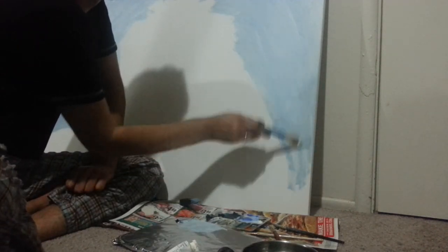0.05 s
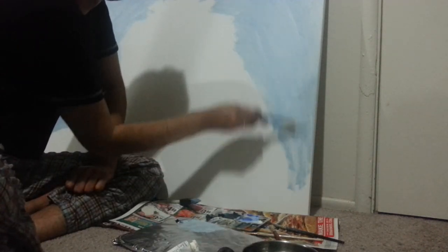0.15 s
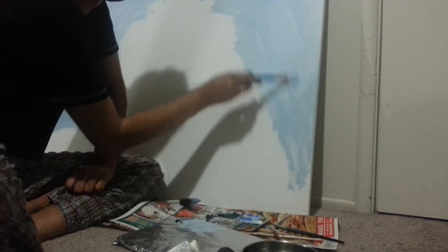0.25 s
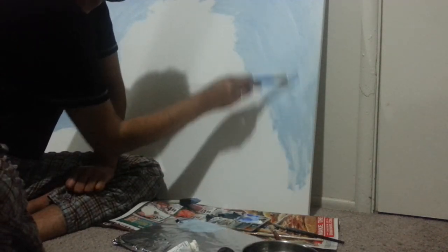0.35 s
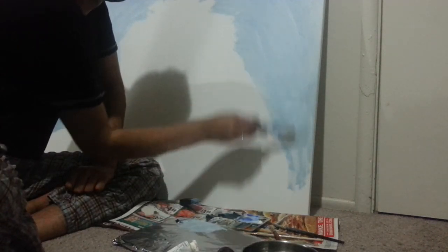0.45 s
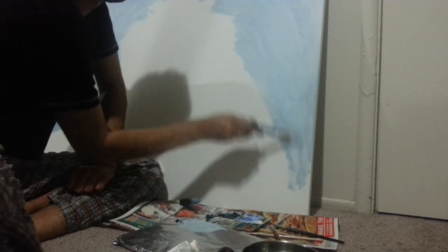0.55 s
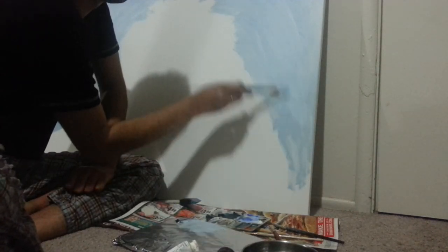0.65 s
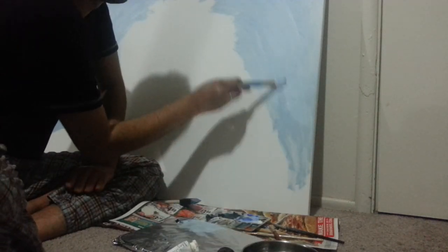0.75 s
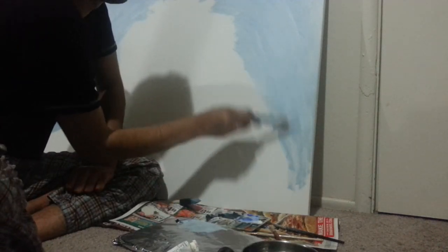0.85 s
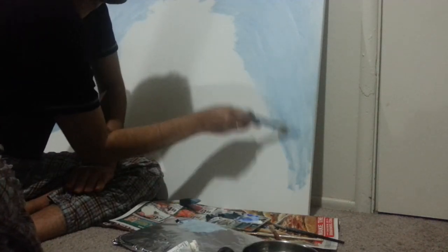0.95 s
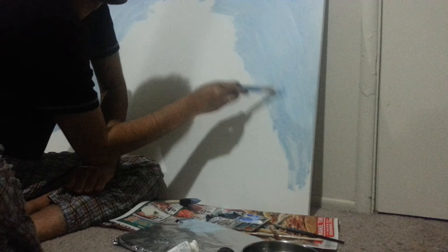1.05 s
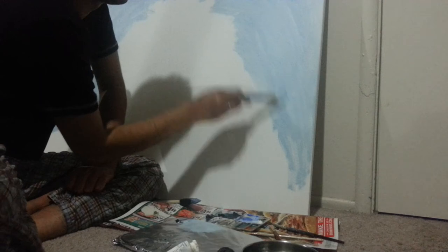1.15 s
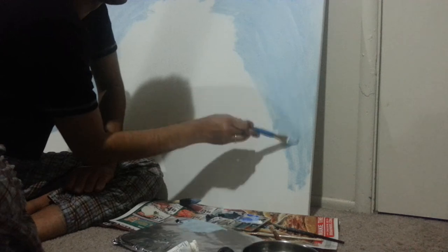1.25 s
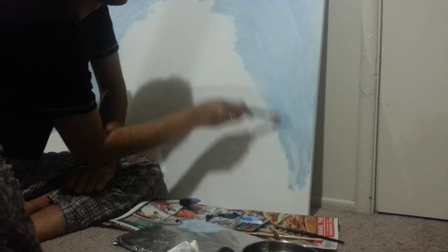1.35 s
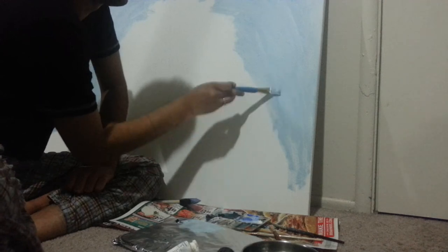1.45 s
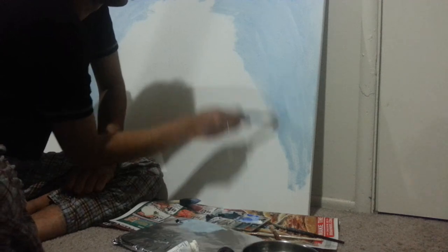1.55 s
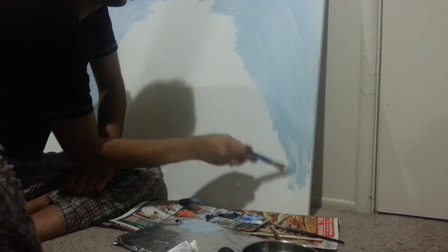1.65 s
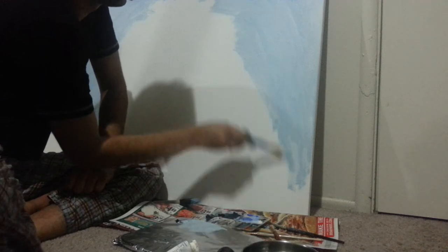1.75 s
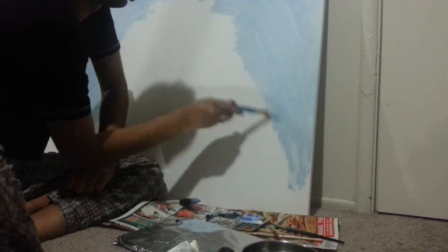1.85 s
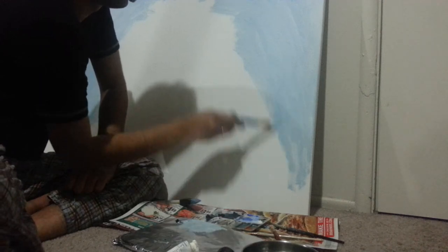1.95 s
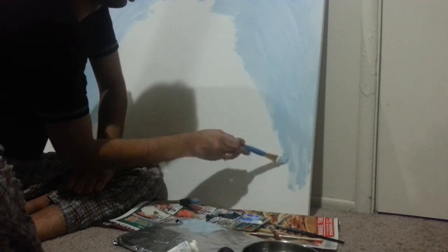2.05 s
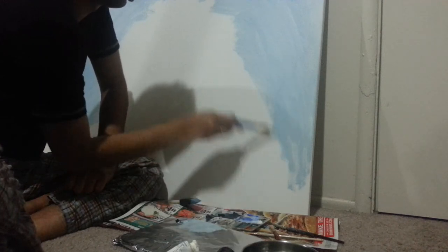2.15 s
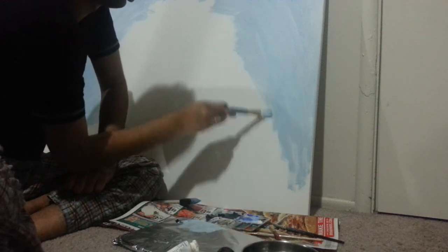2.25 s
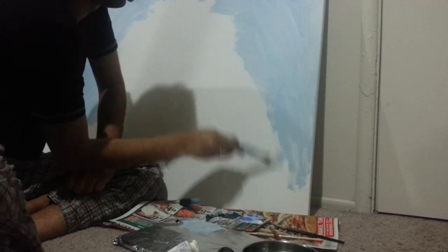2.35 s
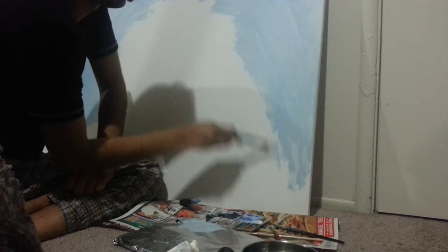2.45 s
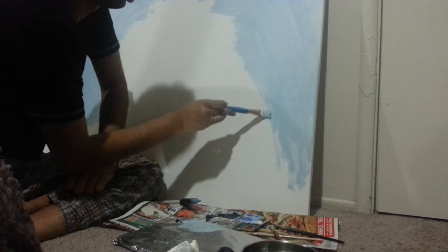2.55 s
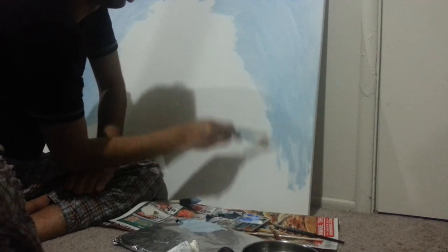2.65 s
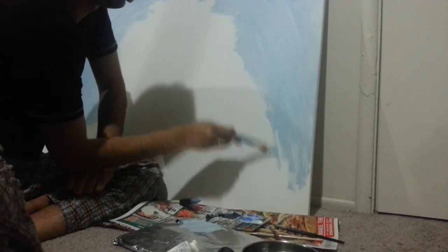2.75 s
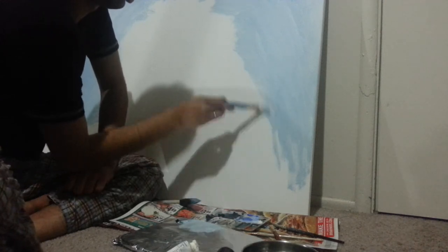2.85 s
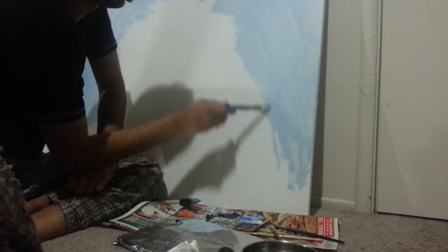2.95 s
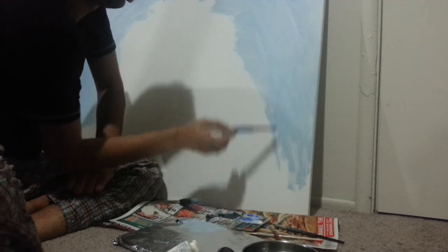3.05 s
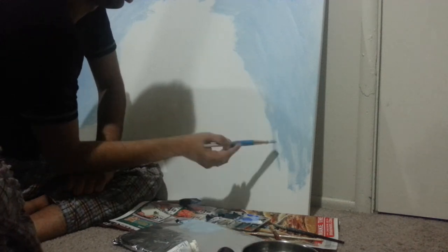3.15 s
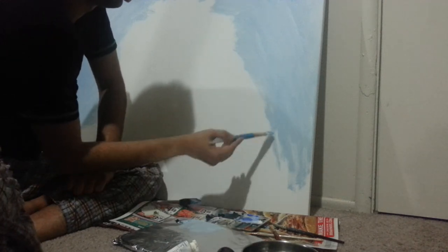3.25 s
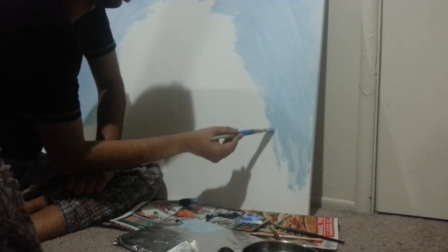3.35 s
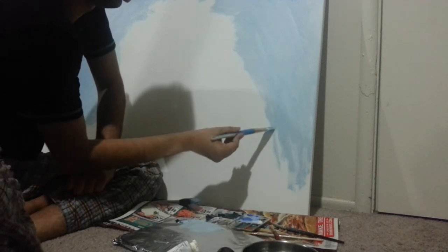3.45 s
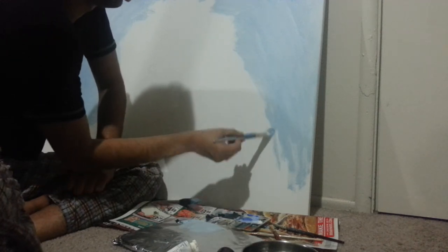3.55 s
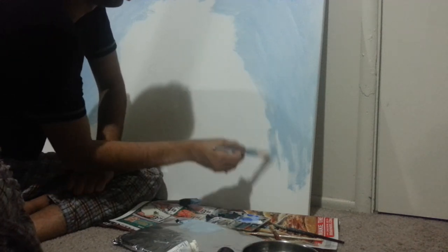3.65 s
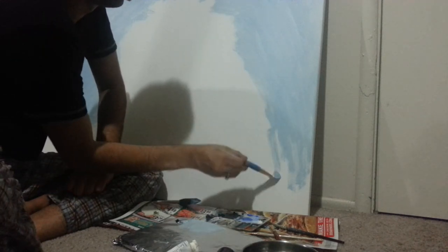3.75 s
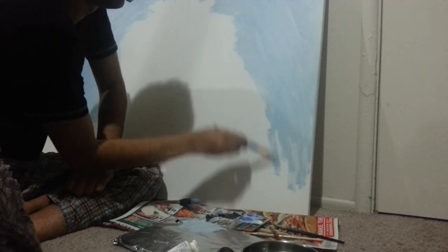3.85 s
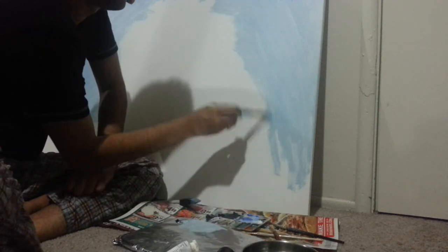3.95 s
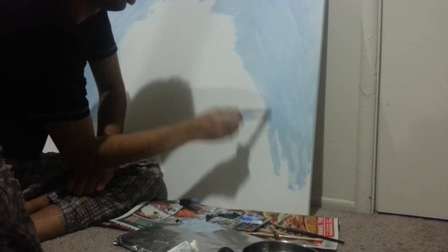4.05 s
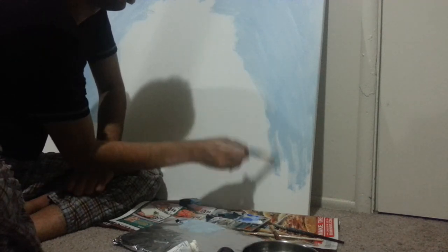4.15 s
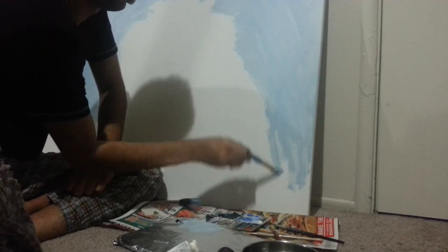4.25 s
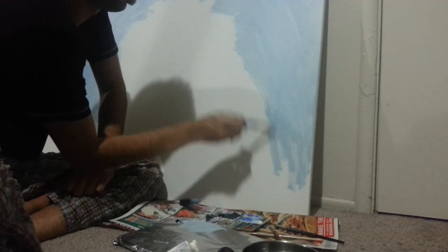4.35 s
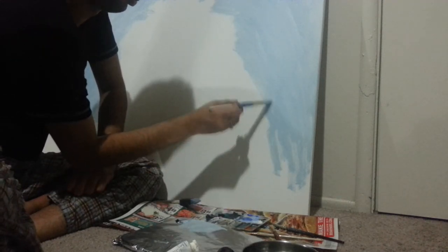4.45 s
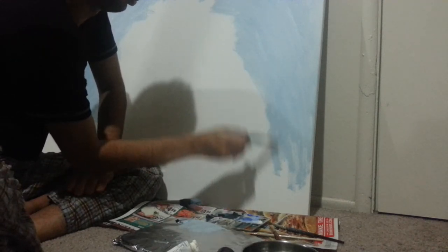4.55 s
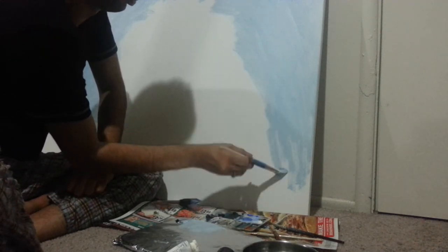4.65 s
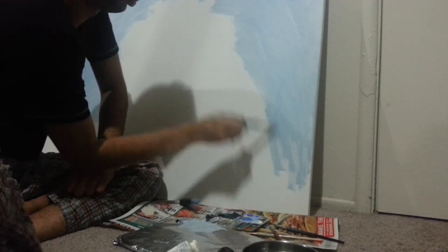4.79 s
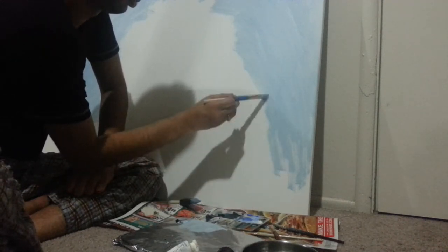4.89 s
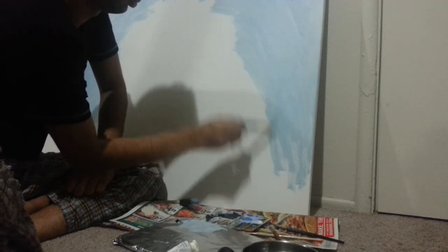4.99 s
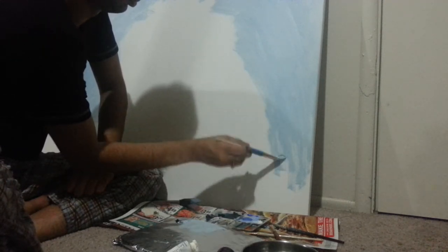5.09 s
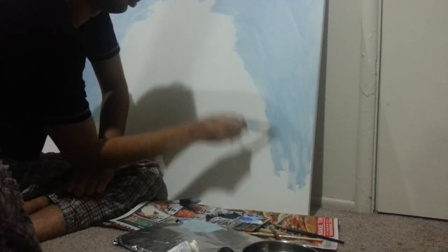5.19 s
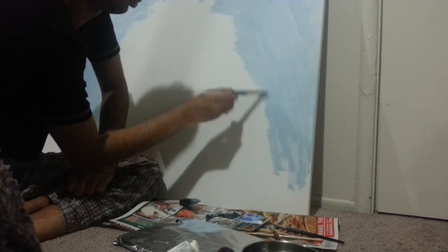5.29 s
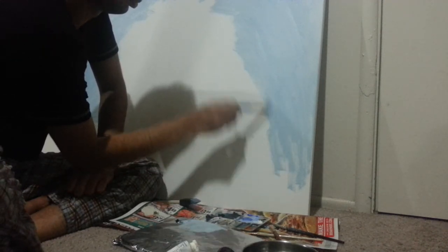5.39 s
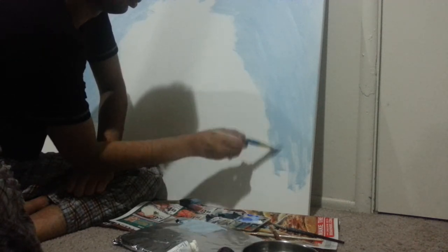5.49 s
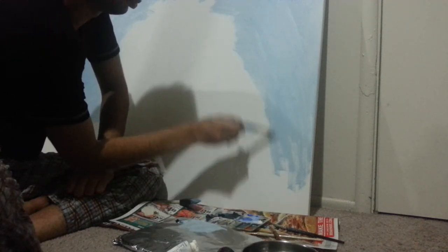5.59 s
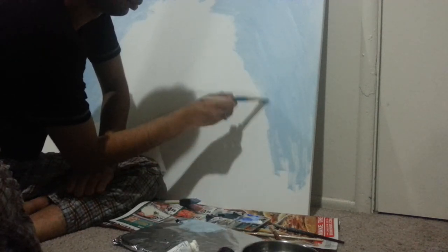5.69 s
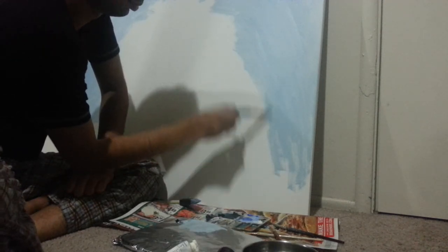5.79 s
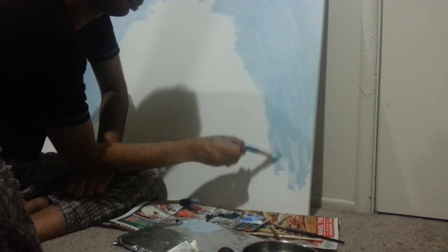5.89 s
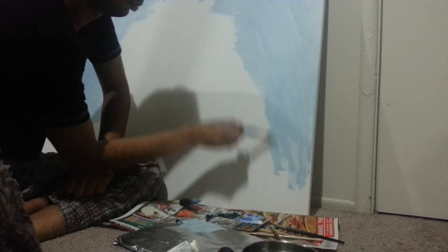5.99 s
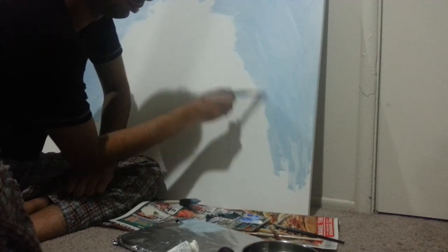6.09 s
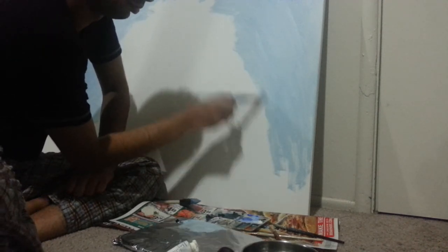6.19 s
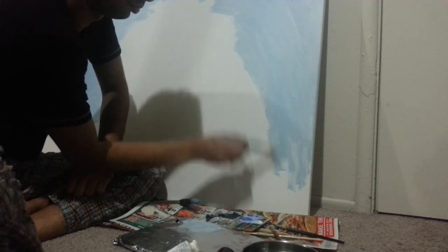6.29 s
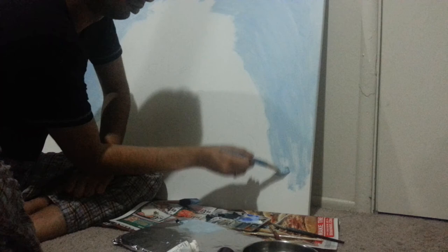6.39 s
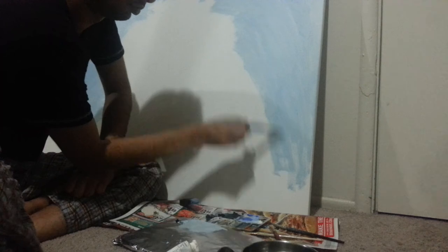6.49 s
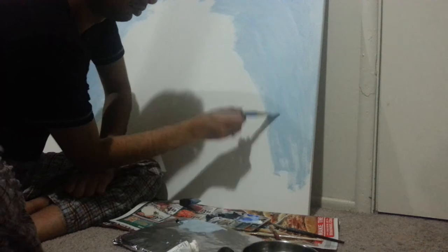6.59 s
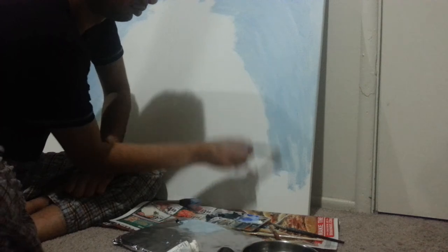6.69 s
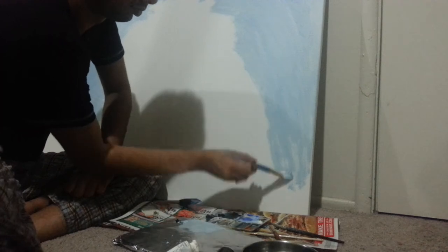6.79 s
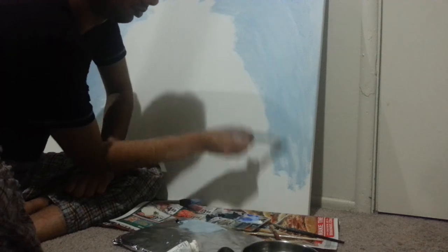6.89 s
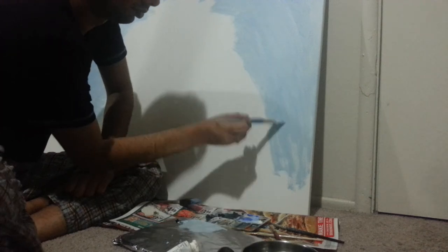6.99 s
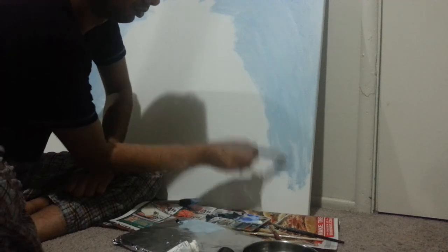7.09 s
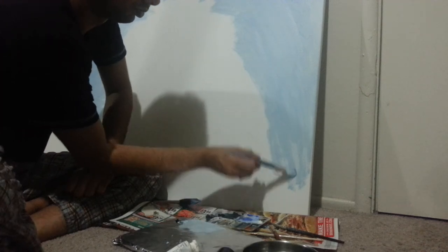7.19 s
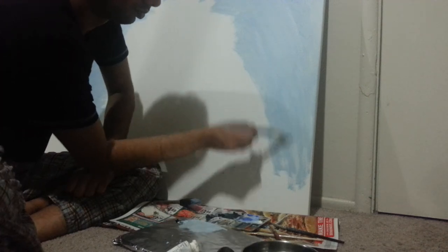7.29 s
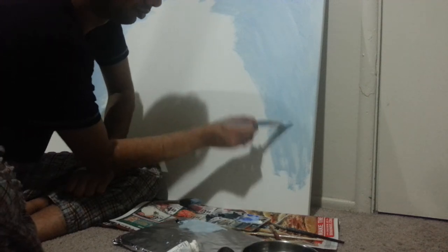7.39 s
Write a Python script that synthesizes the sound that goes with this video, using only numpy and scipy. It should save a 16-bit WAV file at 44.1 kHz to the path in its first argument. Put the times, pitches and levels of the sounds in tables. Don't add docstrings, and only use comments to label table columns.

```python
import sys
import numpy as np
from scipy import signal
from scipy.io import wavfile
from scipy.ndimage import uniform_filter1d

SR = 44100
rng = np.random.default_rng(int(sys.argv[2]) if len(sys.argv) > 2 else 0)


def nominal_scale(level):
    x = np.asarray(level, float) / 20
    return 10 ** x


def unload_wav(signal):
    wavfile.write(
        sys.argv[1],
        SR,
        np.round(np.clip(np.atleast_2d(signal).T, -1, 1) * 32767).astype(np.int16),
    )


N = 327663

# start t/s, rise t/s, hold t/s,
# fizz level/dB, drift over the hold level/dB
STROKES = [(-0.03, 0.029, 0.07, -30, -3), (0.117, 0.09, 0.089, -31.5, -8.5),
           (0.354, 0.051, 0.084, -35.5, 2.5), (0.562, 0.033, 0.089, -31.5, -3),
           (0.734, 0.15, 0.018, -35.5, -1.5), (0.957, 0.06, 0.056, -31.5, -3),
           (1.12, 0.1, 0.029, -36.5, -1), (1.325, 0.045, 0.071, -35.0, -6.5),
           (1.509, 0.043, 0.098, -43.5, 3.5), (1.755, 0.025, 0.095, -34.5, -3.5),
           (1.932, 0.048, 0.068, -44.5, 3.5), (2.114, 0.056, 0.053, -32.5, -2.5),
           (2.27, 0.087, 0.017, -30.5, 1), (2.412, 0.1, 0.005, -29.0, 0.5),
           (2.596, 0.089, 0.0083, -30, 0.5), (2.746, 0.094, 0.098, -31, -18),
           (3.566, 0.028, 0.095, -60, 23), (3.7, 0.035, 0.03, -47.5, -2),
                 (3.822, 0.057, 0.087, -39.5, 2), (4.094, 0.041, 0.042, -45.0, 3.5),
                 (4.285, 0.074, 0.028, -38.0, 0), (4.477, 0.12, 0.056, -42, -5),
                 (4.712, 0.079, 0.035, -40, -3.5), (4.916, 0.13, 0.014, -38.0, -0.5),
                 (5.124, 0.11, 0.043, -37.5, -2.5), (5.352, 0.1, 0.036, -39, 2),
                 (5.573, 0.033, 0.045, -44, 1), (5.766, 0.054, 0.06, -41.5, 8),
                 (5.964, 0.059, 0.029, -43, -1.5), (6.174, 0.11, 0.068, -31.5, -4.5),
                 (6.412, 0.066, 0.035, -43.5, -6.5), (6.622, 0.061, 0.061, -35.0, 2),
                 (6.82, 0.056, 0.029, -43.5, -9), (7.012, 0.095, 0.031, -36.5, -1.5),
                 (7.234, 0.034, 0.045, -43, 0.5), (7.405, 0.032, 0.02, -50.5, 0)]
# t/s, release level/dB, hush before it level/dB
RELEASES = [(0.392, -37.5, -1), (0.5891, -24.5, -3), (0.9971, -17, 0.5), (1.355, -24, 1.5), (1.774, -27, 1),
            (2.149, -20, -5), (3.5843, -36, -1), (3.8437, -45, 0), (4.12, -32, -1), (4.3216, -30, -1),
            (4.757, -25.5, 1.5), (5.8032, -31, 0.5), (0.164, -32, -3), (1.5404, -38, -1), (2.3136, -30, -7),
            (2.4673, -27, 0), (2.6499, -33, -2.5), (3.6257, -30, -3), (3.8676, -26, -3), (4.5226, -45, -1),
            (4.9686, -40, -2), (5.3956, -47, -3), (5.5947, -38, -4), (5.9938, -38, -3), (6.2228, -34, -3),
            (6.6543, -30, -5), (6.8688, -30, 2), (7.0604, -36, -2), (6.2063, -33, 0), (6.636, -30, 0),
            (7.0479, -36, 2), (7.2594, -32, 0.5)]
# f/Hz, left level/dB, right level/dB
FIZZ = [(2950, -19.5, -28.5), (4330, -6.5, -15.5), (5330, -2, -6), (6200, -7, -4), (6500, -10.5, -4.5),
        (7140, -15.5, 1), (7390, -20, -1.5), (8070, -17, -6.5), (9240, -18, -12.5), (11700, -52, -25.5)]
# f/Hz, left level/dB, right level/dB
SCRAPE = [(700, -16, -21), (1350, -16.5, -24), (1700, -1, -7.5), (2140, -2, -5.5), (2680, 1, -2.5),
          (3150, -1, -4.5), (3590, 2, -6.5), (4460, -14, -2.5), (5970, -45, -46)]
# f/Hz, left level/dB, right level/dB
SHEEN = [(7000, -31.5, -9.5), (9200, -8, -2.5), (11100, -5.5, 0), (13600, -14, -10.5), (14330, -23, -9.5),
         (14800, -46, -38)]
# start t/s, level/dB, time to fade by 60 dB t/s
PEELS = [(3.0705, -57, 0.099), (3.156, -59, 0.12), (6.997, -62, .1), (3.335, -72, .08)]
# firmest press t/s, hum under the fizz level/dB, threads passing f/Hz,
# scrape under the fizz level/dB
EARLY_CLOTH = [(0.044, -19.5, 760, -8), (0.218, -19.5, 660, -8.5), (0.454, -12.5, 706, -6.0),
               (0.608, -21.5, 706, -9.5), (0.893, -10.5, 800, -6.5), (1.043, -22, 770, -9.5),
               (1.223, -13.5, 779, -6.5), (1.376, -16, 785, -8), (1.612, -10.5, 747, -5.5),
               (1.796, -20.5, 690, -11.5), (2.037, -10.5, 770, -7.5), (2.184, -18.5, 840, -12.5),
               (2.371, -16.5, 729, -11), (2.526, -20.5, 737, -11.5), (2.674, -15, 770, -13),
               (2.83, -20, 719, -11)]
LATER_CLOTH = [(3.697, -19, 675, -11.5), (3.75, -19, 680, -11), (3.927, -17.5, 708, -11),
               (4.158, -14, 764, -7.5), (4.357, -14.5, 685, -10), (4.601, -8.5, 714, -7.5),
               (4.782, -21.5, 768, -9.5), (5.031, -12.5, 700, -7.5), (5.247, -19.5, 728, -11),
               (5.475, -13, 785, -8), (5.634, -17.5, 790, -10), (5.883, -14.5, 800, -9),
               (6.03, -15, 814, -7), (6.317, -15, 780, -10.5), (6.478, -13, 690, -7.5),
               (6.738, -13, 720, -9.5), (6.892, -20.5, 721, -11), (7.116, -13, 820, -9),
               (7.304, -17.5, 746, -7.5), (7.426, -14, 780, -5)]
# swing t/s, lowest mode level/dB, judder t/s,
# upper modes level/dB, favoured pitch f/Hz
PUSHES = [(0.071, -68, 0.085, -68, 377), (0.266, -67, 0.28, -56, 336), (0.463, -66, 0.44, -54, 371),
          (0.629, -67, 0.58, -58, 370), (0.871, -61, 0.88, -55, 330), (1.048, -60.5, 1.07, -69, 300),
          (1.249, -69, 1.22, -54.0, 353), (1.392, -63, 1.4, -61, 327),
          (1.629, -64.5, 1.65, -56.0, 383), (1.816, -64, 1.802, -58.5, 314),
          (2.046, -66, 2.07, -54, 358), (2.177, -64, 2.19, -63, 333), (2.364, -64, 2.368, -62, 352),
          (2.499, -68, 2.497, -59, 406), (2.685, -61, 2.7, -57, 339), (2.843, -64.0, 2.85, -57, 373),
          (3.12, -70, 3.09, -78.5, 260), (3.18, -69, 3.26, -76, 300), (3.338, -74, 3.34, -74, 480),
          (3.62, -76, 3.64, -63, 345), (3.903, -50, 3.948, -49.5, 330),
                (4.225, -48.5, 4.196, -50.5, 322), (4.417, -47, 4.374, -41.5, 330),
                (4.611, -48, 4.58, -46.5, 314), (4.804, -59, 4.79, -59.5, 336),
                (5.01, -56, 5.018, -47, 334), (5.265, -61, 5.234, -49, 293), (5.48, -58.5, 5.483, -47, 328),
                (5.656, -69.5, 5.639, -69, 303), (5.873, -62, 5.897, -49.5, 407),
                (6.05, -69, 6.03, -65, 346), (6.325, -60.5, 6.324, -49.5, 348), (6.516, -55, 6.5, -51, 314),
                (6.688, -55, 6.712, -49.5, 354), (6.928, -70, 6.89, -69, 325),
                (7.137, -58, 7.144, -53, 330), (7.314, -70.0, 7.316, -57.5, 403),
                (7.426, -75.0, 7.426, -74, 363)]
# f/Hz, width f/Hz, level/dB
LOWEST = [
    (130.2, 38.5, 11),
    (102, 15.5, 5.5),
    (172, 16, -12),
    (65, 22, -0.5),
]
# f/Hz, width f/Hz, level/dB (lowered further away from the favoured pitch)
UPPER = [(229.7, 17, 0.67), (270.2, 21.4, 0.78), (320.8, 29, -1.2), (403, 27, -1.8), (515, 50, -0.5)]
# t/s, upper pair level/dB, its pitch f/Hz, lowest mode level/dB
KNOCKS = [
    (4.358, -32.5, 338, -35.5),
    (4.560, -38, 324, -39),
    (5.213, -38.5, 288, -70),
    (6.464, -35.5, 332.5, -41.5),
]
# t/s, peak level/dB, left minus right level/dB on top of a fixed 14.5 dB lean to the right
TICKS = [(0.3378, -36, -7), (3.0749, -36, -8), (3.1577, -36, -8.5), (6.915, -41, -10), (6.997, -36, -9)]
# f/Hz, time to fade by 60 dB t/s, level/dB
ROOM = [(150, 0.19, -21.5), (990, 0.069, -3.5), (4030, 0.09, -16), (6900, 0.17, -7.5), (12000, 0.2, -5.5)]
# f/Hz, left level/dB, right level/dB
AIR = [(28, -6, -8.5), (65, -25, -29), (130, 3.5, -11), (300, -3, -13), (900, -2, -10), (1800, -6, -13),
       (4200, -8, -12), (7300, -9, -3), (9800, -8, -7.5), (10700, -12, 6.5), (11300, -10, -3),
       (12100, -11, -4), (14500, -7, -12.5), (14900, -46, -44)]


def bristles():
    cloth = EARLY_CLOTH + LATER_CLOTH
    fizz = coloured(slips(30000, 0.6, 0.54), FIZZ, patchy_db=1.33, lead_s=0.00003, sway_s=0.00004)
    scrape = coloured(slips(30000, 0.17, 0.49), SCRAPE, patchy_db=1.5, lead_s=0.00003, sway_s=0.00004)
    sheen = coloured(slips(30000, 0.28, 0.21), SHEEN, patchy_db=2.5, lead_s=0.00003, sway_s=0.00004)
    fizz_db = released(stroked(steep=1.042), burst_db=-23)
    scrape_db = released(stroked(steep=1.196, extra_db=lambda k, t: cloth[k][3]), burst_db=-49)
    sheen_db = -51 + 0.92 * (released(stroked(steep=0.85), burst_db=-29) + 40.5)
    rubbing = nominal_scale(fizz_db + 0.85) * fizz + nominal_scale(scrape_db + 0.83) * scrape + nominal_scale(sheen_db) * sheen
    catch = nominal_scale(1.0 * wander(500, 300))
    t = np.arange(N) / SR
    peel = sum((t > s) * nominal_scale(db - 60 * abs(t - s) / t60) for s, db, t60 in PEELS)
    return catch * rubbing + peel * (0.7 * fizz + 0.3 * scrape + 0.86 * sheen)


def stroked(steep, extra_db=None, contact=False):
    rise_power, lift_s, lift_power = 2.82, 0.096, 1.215
    landing_db, lifting_db, contact_slope = 13, 7.5, 0.49
    t, power = np.arange(N) / SR, np.full(N, 1e-14)
    for k, (s, rise, hold, db, drift_db) in enumerate(STROKES):
        near = slice(max(round(s * SR), 0), round((s + rise + hold + 0.3) * SR))
        late = t[near] - s
        shape_db = drift_db * np.clip((late - rise) / hold, 0, 1)
        shape_db = shape_db - 20 * (np.maximum(late - rise - hold, 0) / lift_s) ** lift_power
        landed = np.sin(np.pi / 2 * np.clip(late / rise, 0, 1)) ** rise_power
        top_db = max(drift_db, 0)
        down_db = top_db - shape_db - 20 * np.log10(landed + 1e-9)
        if contact:
            knee_db = np.where(late < rise, landing_db, lifting_db)
            down_db = down_db - (1 - contact_slope / steep) * np.minimum(down_db, knee_db)
        gain = nominal_scale(db + top_db - steep * down_db)
        if extra_db is not None:
            gain = gain * nominal_scale(extra_db(k, t[near]))
        power[near] += gain ** 2
    return 10 * np.log10(power)


def released(db, burst_db):
    grip_db, let_go_s = 6, 0.002
    t, gain = np.arange(N) / SR, nominal_scale(db)
    for s, release_db, hush_db in RELEASES:
        near = slice(round((s - 0.06) * SR), round((s + 0.1) * SR))
        late = t[near] - s + let_go_s
        hush = nominal_scale(-(hush_db + grip_db) * np.exp(np.minimum(late, 0) / 0.005))
        burst = nominal_scale(release_db + burst_db) * np.exp(-np.maximum(late, 0) / 0.0098)
        burst = burst * np.clip(late / 0.0034, 0, 1)
        freed = gain[near] * (1 - (1 - hush) * np.exp(-late / 0.0016)) + burst
        gain[near] = np.where(late < 0, gain[near] * hush, freed)
    return 20 * np.log10(gain)


def weave():
    press_s, press_db, thread_sag = 0.033, 4.5, 0.11
    s, below_db, hz, _ = np.transpose(EARLY_CLOTH + LATER_CLOTH)

    def pressed(k, t):
        return below_db[k] + press_db * np.exp(-((t - s[k]) / press_s) ** 2)

    hum_db = released(stroked(2.24, pressed, contact=True), burst_db=-26)
    t = np.arange(N) / SR
    slowed = np.clip((np.interp(t, s, hum_db[(s * SR).astype(int)]) - hum_db) / 20, 0, 1)
    uneven = 0.07 * wander(2500, 1500)
    threads_hz = np.interp(t, s, hz) * (1 + uneven - thread_sag * uniform_filter1d(slowed, size=800))
    lumps = nominal_scale(1.4 * wander(1300, 600, shape=(2, N)))
    drive = slips(20000, 0.27, 0.93)
    hum = evened(resonate(resonate(drive, threads_hz, 270), threads_hz, 270))
    rustle = evened(resonate(resonate(drive, 570, 530), 450, 610))
    return nominal_scale(hum_db - 4) * (lumps[0] * hum + nominal_scale(4) * lumps[1] * rustle) / 1.795


def canvas():
    swing_s, swing_db, judder_s, judder_db, pitch_hz = np.transpose(PUSHES)
    tremble = nominal_scale(-37 + stroked(steep=0.97, contact=True))
    low_gain = bumps(swing_s, swing_db, rise=0.083, fall=0.1) + tremble
    up_gain = bumps(judder_s, judder_db, rise=0.058, fall=0.07) + nominal_scale(8) * tremble
    judder = slips(900, 2.3, 0.85)

    def ring(hz, width):
        return evened(resonate(resonate(judder, hz, width), hz, 2.9 * width))

    def steady(x, window_s):
        return x / np.sqrt(uniform_filter1d((x ** 2).mean(0), int(window_s * SR)) + 0.32)

    swing_hz = LOWEST[0][0] + 7.39 * wander(2000)
    swing = np.sqrt(2) * np.sin(2 * np.pi * np.cumsum(swing_hz) / SR + [[0.22], [-0.22]])
    firm = np.clip((20 * np.log10(low_gain) + 65.2) / 16, 0, 1)
    lowest = evened(sum(nominal_scale(db) * ring(hz, width) for hz, width, db in LOWEST))
    lowest = 0.62 * firm * swing + (1 - 0.37 * firm) * steady(lowest, 0.064)
    lowest = lowest * nominal_scale([[-0.8], [0.8]])
    favoured_hz = np.interp(np.arange(N) / SR, judder_s, pitch_hz)
    near = [nominal_scale(db - 15.3 * abs(np.log2(hz / favoured_hz))) for hz, _, db in UPPER]
    upper = sum(gain * ring(hz, width) for gain, (hz, width, _) in zip(near, UPPER))
    upper = upper / np.linalg.norm(near, axis=0)
    drum = nominal_scale(2) * low_gain * lowest + nominal_scale(1.54) * up_gain * steady(upper, 0.1)
    return signal.sosfilt(signal.butter(2, 35, "high", fs=SR, output="sos"), drum)


def bumps(times, dbs, rise, fall):
    late = np.arange(0, N, 64)[:, None] / SR - times
    db = dbs - 20 * (np.maximum(-late, 0) / rise) ** 1.35 - 20 * (np.maximum(late, 0) / fall) ** 1.04
    return np.repeat(np.linalg.norm(nominal_scale(db), axis=1), 64)[:N]


def knocks():
    t, out = np.arange(SR // 2) / SR, np.zeros((2, N))

    def tone(hz):
        return np.sin(2 * np.pi * hz * t)

    swell = np.exp(-((t - 0.054) / 0.042) ** 2) + 0.14 * np.exp(-t / 0.076)
    swell = swell * np.minimum(t / 0.017, 1)
    note = np.sin(2 * np.pi * 135.4 * t + [[0.22], [-0.22]])
    thud = 0.7 * np.minimum(t / 0.006, 1) * nominal_scale(-60 * t / 0.2) * tone(104.4)
    low = swell * (note + 0.25 * tone(194) + 0.07 * tone(58)) + thud
    strike = (1 - np.exp(-(t / 0.0044) ** 2)) * nominal_scale(-60 * t / 0.12)
    for s, db, hz, low_db in KNOCKS:
        pair = tone(hz) + 0.61 * tone(0.89 * hz) + 0.28 * tone(1.3 * hz)
        knock = nominal_scale(db) * strike * pair + nominal_scale(low_db) * low
        out[:, round(s * SR):][:, :len(t)] += knock * nominal_scale([[-0.7], [0.7]])
    return out


def ticks():
    t, direct, sideways = np.arange(100) / SR, np.zeros((2, N)), np.zeros((2, N))

    def tone(hz):
        return np.sin(2 * np.pi * hz * t)

    snap = tone(7500) + tone(8900) + tone(10700)
    bright = snap + 0.42 * tone(13200)
    dull = snap + 1.65 * tone(5200) + 0.78 * tone(2400)
    for s, db, pan_db in TICKS:
        at = round((s + 0.00064) * SR)
        swell = nominal_scale(db) * (t / 0.00024) ** 2 * np.exp(-t / 0.00012)
        direct[:, at:at + 100] += swell * bright * nominal_scale([[3.5 + pan_db / 2], [18 - pan_db / 2]])
        for late_s, share in ((0, 0.92), (0.007, 0.56), (0.016, 0.6)):
            echo = at + round(late_s * SR)
            sideways[:, echo:echo + 100] += share * swell * dull
    return signal.sosfilt(signal.butter(4, 5800, "high", fs=SR, output="sos"), direct), sideways


def room(x, gap_s):
    length = SR // 3
    taps = np.zeros((6, length))
    at = np.arange(int(gap_s * SR), length - 20, 20)
    at = at + rng.integers(0, 20, (len(at), 6)).T
    np.put_along_axis(taps, at, rng.choice([-1., 1.], at.shape), 1)
    hz, t, z = signal.stft(taps, SR, nperseg=128)
    f, *columns = np.transpose(ROOM)
    t60, db = (np.interp(np.log(hz + 1), np.log(f), c)[:, None] for c in columns)
    fade = nominal_scale(-60 * t / t60) * np.sqrt(0.0083 / t60)
    tails = signal.istft(z * fade * nominal_scale(db), SR, nperseg=128)[1].reshape(3, 2, -1)
    turn = 2 * np.pi * (4.3 * np.arange(N) / SR + np.arange(3)[:, None, None] / 3)
    return signal.oaconvolve(np.sqrt(2 / 3) * np.cos(turn) * x, tails, axes=2).sum(0)[:, :N]


def air():
    hiss = rng.standard_normal((2, N))
    gusts = nominal_scale(3 * wander(3000))
    hiss += 1.6 * gusts * resonate(rng.standard_normal(N), 93, 220)
    return nominal_scale(-69.8) * coloured(hiss, AIR, patchy_db=2.3)


def slips(per_s, spread_db, same):
    clicks = rng.standard_normal((2, N)) * (rng.random((2, N)) < per_s / SR)
    a, b = clicks * nominal_scale(spread_db * np.minimum(rng.exponential(1, (2, N)), 4))
    return evened(np.array([a, same * a + np.sqrt(1 - same ** 2) * b]))


def coloured(x, ports, patchy_db, lead_s=0, sway_s=0):
    hz, t, z = signal.stft(x, SR, nperseg=512, noverlap=384)
    f, *sides = np.transpose(ports)
    shape_db = np.array([np.interp(np.log(hz + 1), np.log(f), side) for side in sides])
    patches = rng.standard_normal((len(hz), len(t)))
    patches = uniform_filter1d(patches, size=3, axis=0)
    patches = evened(uniform_filter1d(patches, size=12, axis=1))
    z = z * nominal_scale(shape_db[:, :, None] + patchy_db * patches)
    sway = wander(40, shape=len(t))
    z[0] *= np.exp(2j * np.pi * hz[:, None] * (lead_s + sway_s * sway))
    return evened(signal.istft(z, SR, nperseg=512, noverlap=384)[1][:, :N])


def resonate(x, hz, width):
    turn = np.exp(2j * np.pi * np.cumsum(hz * np.ones(N)) / SR)
    r = np.exp(-np.pi * width / SR)
    return 2 * (turn * signal.lfilter([1 - r], [1, -r], x / turn + 1e-18)).real


def wander(*sizes, shape=N):
    x = rng.standard_normal(shape)
    for size in sizes:
        x = uniform_filter1d(x, size=size)
    return evened(x)


def evened(x):
    return x / np.sqrt(np.mean(x ** 2) + 1e-20)


def scene():
    rub = signal.sosfilt(signal.butter(3, 230, "high", fs=SR, output="sos"), bristles() + weave())
    brush = rub + canvas() + knocks()
    snaps, sideways = ticks()
    mix = brush + snaps + room(brush + nominal_scale(16.5) * sideways, gap_s=0.0028)
    mix[1] = np.roll(mix[1], 1)
    return mix + air()


def top_cut(x):
    return signal.sosfilt(signal.butter(12, 14700, fs=SR, output="sos"), x)


def record(dry):
    edge = signal.firwin(401, 14620, window=("kaiser", 8), fs=SR)
    limited = signal.oaconvolve(dry, edge[None], "same") - 0.0003
    return top_cut(limited)


dry = scene()
out = record(dry)
unload_wav(out)
```